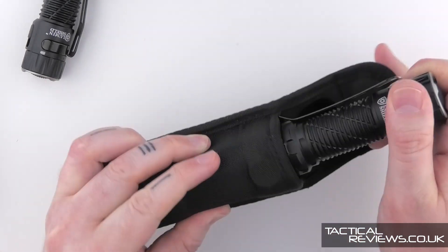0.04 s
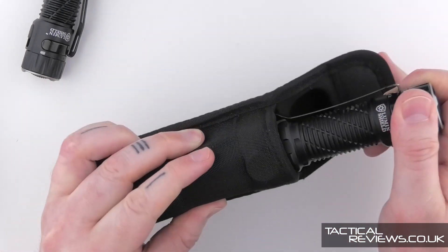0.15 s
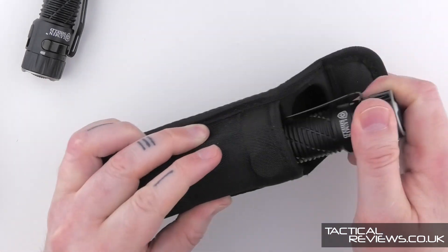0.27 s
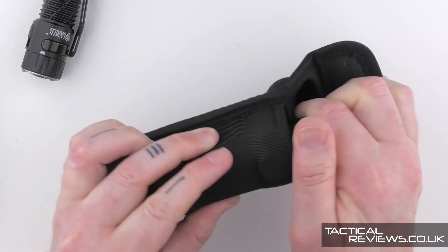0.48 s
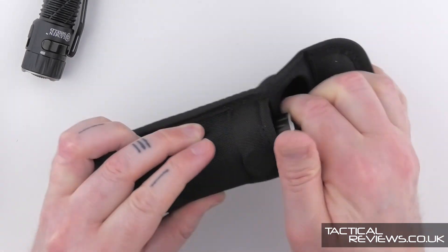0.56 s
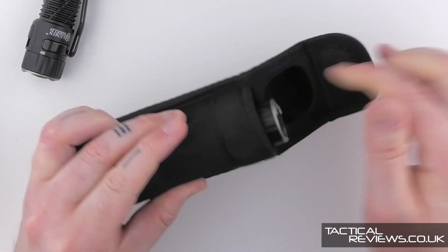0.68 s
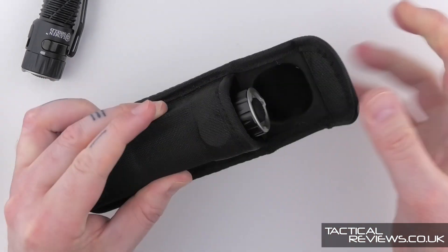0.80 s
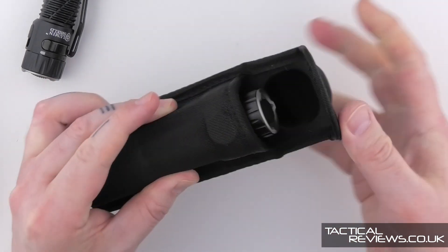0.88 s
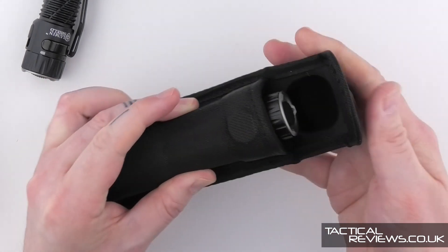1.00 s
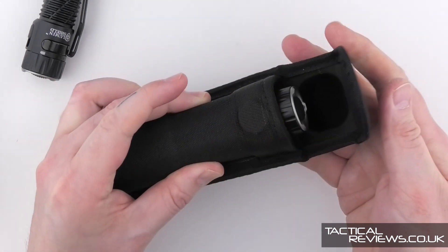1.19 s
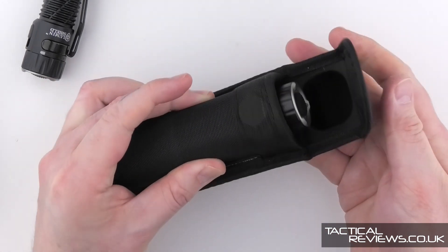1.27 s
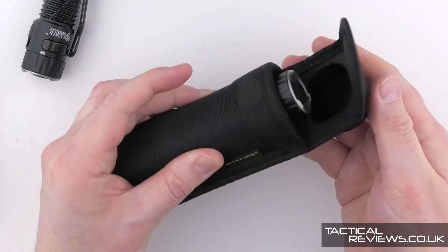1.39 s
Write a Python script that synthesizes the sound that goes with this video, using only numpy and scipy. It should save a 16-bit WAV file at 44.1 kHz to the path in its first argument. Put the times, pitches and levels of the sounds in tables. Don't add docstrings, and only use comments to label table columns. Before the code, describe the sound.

Knurled metal tube rasps into a fabric pouch, its clip snapping, then thuds home with a rattling clatter

```python
import sys
import numpy as np
from scipy import signal
from scipy.fft import rfft, irfft
from scipy.io import wavfile
from scipy.ndimage import uniform_filter1d

SR = 44100
rng = np.random.default_rng(int(sys.argv[2]) if len(sys.argv) > 2 else 0)


def waveform_to_disk(signal):
    frames = np.transpose(np.atleast_2d(signal))
    scaled = np.clip(frames, -1, 1) * 32767
    samples = np.round(scaled).astype(np.int16)
    wavfile.write(sys.argv[1], SR, samples)


def makeup_ratio(level_db):
    decades = np.asarray(level_db, float) / 20
    return 10 ** decades


N = 63945

# peak t/s, rise/s, fall/s (both over 20 dB), level/dB, brightness f/Hz
RUB_STROKES = [(0.0, .01, 0.048, -31.5, 6800), (0.062, 0.019, 0.068, -40.5, 7070),
               (0.148, 0.04, 0.071, -37.5, 8800), (0.225, 0.0044, 0.021, -31.5, 7700),
               (0.227, 0.01, 0.029, -25, 6800), (0.252, 0.067, 0.052, -33.5, 6470),
               (0.362, 0.03, 0.02, -31.5, 9250), (0.39, 0.05, 0.054, -30.5, 7060),
               (0.41, 0.031, 0.02, -29.5, 9000), (0.436, 0.033, 0.025, -18.5, 7240),
               (.455, 0.029, 0.0084, -39, 8950), (.52, 0.058, 0.12, -47.5, 7650),
               (0.586, 0.043, 0.036, -47.5, 9500), (.645, 0.02, 0.029, -42, 6700),
               (0.666, 0.036, 0.18, -53.5, 8800), (0.69, 0.077, 0.0061, -37, 8070)]
# peak t/s, rise/s, fall/s,
# level/dB, brightness f/Hz
BRUSH_STROKES = [(.825, .003, .035, -51, 6500), (.978, .012, .03, -46, 10000), (.98, .012, .025, -53, 5200),
                 (.875, .05, .05, -53, 8000), (.92, .02, .04, -56, 9000), (1.008, .03, .04, -56, 9000),
                 (1.04, .03, .04, -63, 9000), (.868, .015, .03, -64, 2900), (1.105, .02, .05, -61, 5000),
                 (1.2, .05, .05, -62, 9000), (1.2, .6, .8, -65, 11000), (1.355, .004, .008, -52, 8000),
                 (1.385, .03, .03, -58, 8500), (1.305, .04, .05, -62, 11000)]
# f/Hz, density/dB per Hz
NYLON_SPECTRUM = [(880, 3.5), (1500, 10), (3110, 0.5), (4740, -5.5), (7170, -7.5), (8990, -5),
                  (13600, -2.5), (15700, -10.5)]
# t/s, level/dB, contact/ms, favoured f/Hz
CLIP_SNAPS = [(.223, -33.5, 0.6, 900), (.2277, -12, 0.2, 880), (.2312, -12, 0.25, 850),
              (.2292, -9, 0.07, 2900), (.2299, -12, 0.08, 2000), (.2335, -12, 0.07, 3100),
              (.2355, -20, 0.2, 1200), (.2405, -20, 0.15, 1500), (.2425, -22, .25, 790),
              (.2465, -24, .25, 800), (.257, -29, .6, 320), (.2755, -28, .15, 1500)]
# f/Hz, level/dB, t60/s
TUBE_MODES = [(308, -9.5, 0.075), (486, 4, 0.1), (650, -6, 0.067), (786, -4, 0.077), (890, 1.5, 0.024),
              (987, 5, 0.038), (1160, 5.5, 0.029), (1300, -5, 0.05), (1474, 6.5, 0.12), (1700, 1, 0.075),
              (1990, 8, 0.054), (2260, 9, 0.019), (2934, 9.5, 0.034), (3177, 18.5, 0.0071)]
# t/s, level/dB, contact/ms, favoured f/Hz
TUBE_KNOCKS = [(.0003, -23, 0.55, 630), (.0006, -24, 0.22, 1810), (.007, -28, 0.46, 760),
               (.4107, -14, 0.16, 1010), (.4134, -11, 0.22, 810), (.419, -10, 0.15, 730),
               (.4212, -15.5, 0.067, 2900), (.4257, -14.5, 0.079, 1800), (.4295, -8, 0.15, 1330),
               (.432, -13, 0.15, 1080), (.4352, -13.5, 0.1, 930), (.4375, -17.5, 0.13, 1700),
               (.4412, -12.5, 0.15, 680), (.4432, -19.5, 0.13, 1660), (.4478, -17, 0.33, 840),
               (.4484, -19.5, 0.1, 1908), (.4527, -20, 0.14, 1760), (.454, -14, 0.35, 650),
               (.4568, -14, 0.21, 890), (.463, -25.5, 0.58, 850)]
# f/Hz, level/dB, t60/s
HOLSTER_MODES = [(350, -5, 0.18), (462.4, -7, 0.23), (598, 2.5, 0.062), (740, 5.5, 0.027),
                 (805.6, -1, 0.073), (867, 6.5, 0.034), (912, 9, 0.017), (986, 7.5, 0.066),
                 (1115, 6.5, 0.02), (1337, 9, 0.021), (1613, 7, 0.042), (1870, 4, 0.053), (2266, -6, 0.032),
                 (2900, 7, 0.03)]
# peak t/s, rise/s, fall/s, level/dB, brightness f/Hz
WALL_DRAGS = [(0.01, 0.048, 0.021, -35.5, 650), (0.043, 0.027, 0.071, -40.5, 476),
              (0.094, .03, 0.047, -53.5, 736), (0.244, 0.038, 0.061, -40, 1200),
              (0.263, 0.0082, 0.025, -37.5, 327), (.28, 0.0081, 0.022, -54.5, 1300),
              (0.441, 0.051, 0.041, -29.5, 880), (0.435, 0.036, 0.054, -35, 1670),
              (.432, 0.041, 0.034, -30.5, 2900), (.3, 0.036, 0.047, -45, 1300),
              (.515, .04, 0.017, -76, 1190), (.55, 0.032, 0.37, -67, 880), (.86, 0.15, 0.026, -62, 1215),
              (0.983, 0.013, 0.045, -68.5, 1700), (1.105, 0.018, 0.028, -63, 1300),
              (1.231, 0.036, 0.15, -67, 600), (1.369, 0.088, 0.27, -63, 1010)]
# t/s, length/s, level/dB,
# pitch f/Hz
FINGER_SQUEAKS = [(.357, .006, -27, 2020), (.49, .036, -38, 870), (.674, .02, -48, 3350),
                  (.528, .03, -50, 1300), (.632, .008, -45, 2000), (.642, .007, -42, 2030),
                  (.655, .009, -42, 1290), (.738, .015, -53, 470), (.764, .035, -53, 460),
                  (.764, .04, -53, 1130), (.74, .065, -60, 203), (.82, .015, -53, 1340),
                  (.826, .018, -49, 1860), (.826, .014, -55, 1020), (.855, .024, -50, 1980),
                  (.864, .022, -55, 1330), (.976, .012, -53, 3420), (.972, .018, -55, 4750),
                  (.686, .01, -42, 1950), (1.1, .018, -59, 1610), (1.092, .02, -62, 1100),
                  (1.12, .02, -62, 670), (.74, .008, -57, 2150), (1.37, .02, -60, 470),
                  (1.349, .035, -60, 1800), (.872, .008, -53, 2200), (.882, .03, -57, 1960),
                  (.862, .02, -58, 3300), (.985, .01, -55, 5450), (.02, .015, -49, 2800),
                  (.058, .012, -49, 3400), (.706, .012, -55, 480), (.822, .008, -56, 3150),
                  (.84, .05, -60, 430)]
# f/Hz, density/dB per Hz
AIR_SPECTRUM = [(41, -16), (70, -1.5), (459, -9.5), (576, -10.5), (1010, -16.5), (1330, -16.5),
                (1560, -15.5), (11000, -24.5), (15700, -48)]
# f/Hz, width/Hz, level/dB
RUMBLE_BANDS = [(22, 20, -52.5), (36, 11, -64), (49, 20, -53), (99, 11, -67)]

GRAINS_PER_S, GRAIN_SPREAD_DB, FLICKER_DB, WEAVE_PATCH_DB = 26000, 1.2, .7, 2.2
SWELL_POWER, FADE_POWER = 1.6, 1.3
RUB_OCTAVES, RUB_SKIRT_DB, RUB_INTO_BODY_DB = .55, -19, -18
DRAG_OCTAVES, DRAG_SKIRT_DB = .55, -26
RING_S, MODE_SCATTER_DB, MODE_DETUNE = .25, 3.5, .018
SPOT_OCTAVES, SPOT_SKIRT_DB = .39, -24.5
SNAP_CRACK_DB, KNOCK_CRACK_DB, CRACK_S, CRACK_TOP_HZ = -1, -15, .004, 6700
BODY_LOW_CUT_HZ = 300
SQUEAK_ROUGH, SQUEAK_FLUTTER_DB = .022, 2.4
ROOM_T60_LOW_S, ROOM_T60_HIGH_S, ROOM_ONSET_S, ROOM_DB, ROOM_SPLIT_HZ = .4, .21, .0075, -10.5, 4900
AIR_DB, AIR_SWAY_DB, AIR_SWAY_HZ = -59, .7, 14
RUMBLE_FADE_DB_PER_S = 1.5


def rubs():
    cells = signal.stft(slips(140), nperseg=256)[2]
    patch = rng.standard_normal(cells.shape)
    for axis in (0, 1):
        patch = uniform_filter1d(patch, size=3, axis=axis)
    weave = signal.istft(cells * makeup_ratio(WEAVE_PATCH_DB * unit(patch)), nperseg=256)[1][:N]
    rustle = colour(weave, [(200, -24)] + NYLON_SPECTRUM)
    return strokes(rustle, RUB_STROKES + BRUSH_STROKES, RUB_OCTAVES, RUB_SKIRT_DB)


def slips(flicker_hz):
    caught = rng.random(N) < GRAINS_PER_S / SR
    clicks = caught * rng.standard_normal(N) * makeup_ratio(GRAIN_SPREAD_DB * rng.exponential(size=N))
    return clicks * makeup_ratio(FLICKER_DB * walk(flicker_hz))


def strokes(source, table, octaves, skirt_db):
    t, f = np.arange(N) / SR, np.fft.rfftfreq(N, 1 / SR) + 1
    spectrum, out = rfft(source), np.zeros(N)
    for peak_s, rise_s, fall_s, db, hz in table:
        tone = np.exp(-.5 * (np.log2(f / hz) / octaves) ** 2) + makeup_ratio(skirt_db)
        away_s = np.abs(t - peak_s)
        swell, fade = (away_s / rise_s) ** SWELL_POWER, (away_s / fall_s) ** FADE_POWER
        down = np.where(t < peak_s, swell, fade)
        out = out + unit(irfft(spectrum * tone, N)) * makeup_ratio(db - 20 * down)
    return out


def snaps():
    return hits(CLIP_SNAPS, TUBE_MODES, SNAP_CRACK_DB)


def knocks():
    return hits(TUBE_KNOCKS, HOLSTER_MODES, KNOCK_CRACK_DB)


def hits(table, modes, crack_db):
    out, size = np.zeros(N), int(RING_S * SR)
    scatters = rng.standard_normal((len(table), len(modes), 2))
    lowpass = signal.butter(2, CRACK_TOP_HZ, fs=SR, output="sos")
    noises = signal.sosfilt(lowpass, rng.standard_normal((len(table), size)))
    crack_gain = makeup_ratio(crack_db - 20 * np.arange(size) / SR / CRACK_S)
    for (s, db, contact_ms, spot_hz), scatter, noise in zip(table, scatters, noises):
        u = np.arange(256) / SR * 1000 / contact_ms
        push = u * np.exp(-2 * u)
        body = np.convolve(ring(struck_at(modes, spot_hz), scatter), push)[:size]
        out = place(out, makeup_ratio(db + 1.0) * (body / np.abs(body).max() + crack_gain * noise), s)
    return out


def struck_at(modes, spot_hz):
    struck = []
    for hz, db, t60_s in modes:
        gain = np.exp(-.5 * (np.log2(hz / spot_hz) / SPOT_OCTAVES) ** 2) + makeup_ratio(SPOT_SKIRT_DB)
        struck.append((hz, db + 20 * np.log10(gain), t60_s))
    return struck


def ring(modes, scatter):
    t = np.arange(int(RING_S * SR)) / SR
    out = np.zeros(len(t))
    for (hz, db, t60_s), (a, b) in zip(modes, scatter):
        decay = makeup_ratio(db + MODE_SCATTER_DB * a - 60 * t / t60_s)
        out += decay * np.sin(2 * np.pi * hz * (1 + MODE_DETUNE * b) * t)
    return out


def through_holster(x):
    return signal.fftconvolve(x, ring(HOLSTER_MODES, np.full((14, 2), .1)))[:N]


def drags():
    return strokes(through_holster(slips(64)), WALL_DRAGS, DRAG_OCTAVES, DRAG_SKIRT_DB)


def shaken_body(rub):
    shaken = through_holster(np.abs(rub) * np.sign(rng.standard_normal(N)))
    return makeup_ratio(RUB_INTO_BODY_DB) * unit(shaken) * np.sqrt(np.mean(rub ** 2))


def squeaks():
    out, t = np.zeros(N), np.arange(4096) / SR
    for s, length_s, db, hz in FINGER_SQUEAKS:
        waver, size = (unit(uniform_filter1d(v, size=160)) for v in rng.standard_normal((2, 4096)))
        phase = 2 * np.pi * hz * np.cumsum(1 + SQUEAK_ROUGH * waver) / SR
        tone = np.sin(phase) * makeup_ratio(SQUEAK_FLUTTER_DB * size)
        swell = 3.0 * t / length_s * np.exp(-2 * (t / length_s) ** 2)
        out = place(out, makeup_ratio(db) * tone * swell, s)
    return out


def room(x):
    t = np.arange(int(.5 * SR)) / SR
    noise = rng.standard_normal(len(t))
    low = signal.sosfilt(signal.butter(2, ROOM_SPLIT_HZ, fs=SR, output="sos"), noise)
    tail = low * makeup_ratio(-60 * t / ROOM_T60_LOW_S) + (noise - low) * makeup_ratio(-60 * t / ROOM_T60_HIGH_S)
    tail = tail * np.clip(t / ROOM_ONSET_S, 0, 1)
    energy = np.sum(noise ** 2 * makeup_ratio(-120 * t / ROOM_T60_LOW_S))
    return x + makeup_ratio(ROOM_DB) * signal.fftconvolve(x, tail / np.sqrt(energy))[:N]


def background():
    air = unit(colour(rng.standard_normal(N), AIR_SPECTRUM))
    out = air * makeup_ratio(AIR_DB + AIR_SWAY_DB * walk(AIR_SWAY_HZ))
    fade_db = RUMBLE_FADE_DB_PER_S * (np.arange(N) / SR - 1.1)
    for hz, width_hz, db in RUMBLE_BANDS:
        out = out + makeup_ratio(db - fade_db) * unit(band(rng.standard_normal(N), hz, width_hz))
    return out


def unit(x):
    return x / np.sqrt(np.mean(x ** 2))


def colour(x, table):
    f, points = np.fft.rfftfreq(len(x), 1 / SR) + 1, np.array(table, float)
    db = np.interp(np.log(f), np.log(points[:, 0]), points[:, 1], left=-60)
    return irfft(rfft(x) * makeup_ratio(db), len(x))


def band(x, hz, width_hz):
    f = np.fft.rfftfreq(len(x), 1 / SR) + 0.0017
    return irfft(rfft(x) / (1 + ((f - hz * hz / f) / width_hz) ** 2), len(x))


def place(out, x, s):
    pad = np.zeros(N + len(x))
    i = max(int(s * SR), 0)
    pad[i:i + len(x)] = x
    return out + pad[:N]


def walk(rate_hz):
    k = int(SR / rate_hz)
    return unit(uniform_filter1d(uniform_filter1d(rng.standard_normal(N), k), k))


def scene():
    rub = rubs()
    near = rub + shaken_body(rub) + drags() + snaps() + knocks()
    low_cut = signal.butter(2, BODY_LOW_CUT_HZ, "high", fs=SR, output="sos")
    near = signal.sosfilt(low_cut, near) + squeaks()
    return (room(near) + background())[None]


def top_cut(x):
    return signal.sosfilt(signal.butter(12, 15890, fs=SR, output="sos"), x)


def record(dry):
    return top_cut(dry)


dry = scene()
out = record(dry)
waveform_to_disk(out)
```